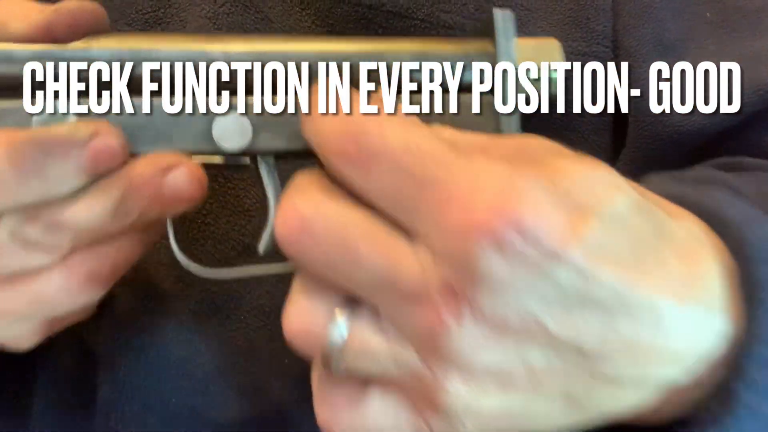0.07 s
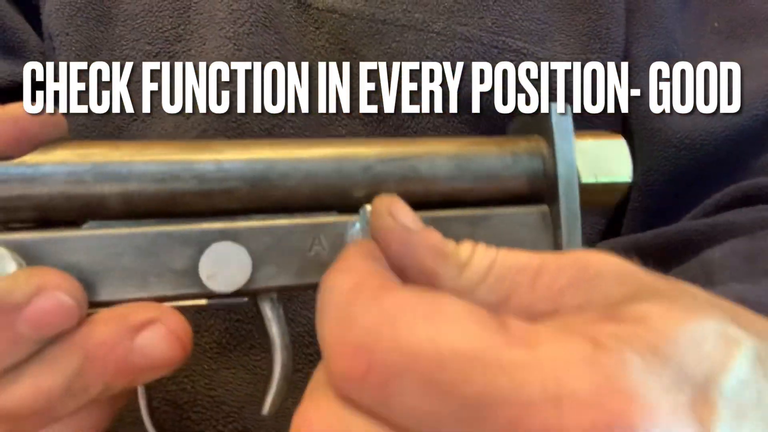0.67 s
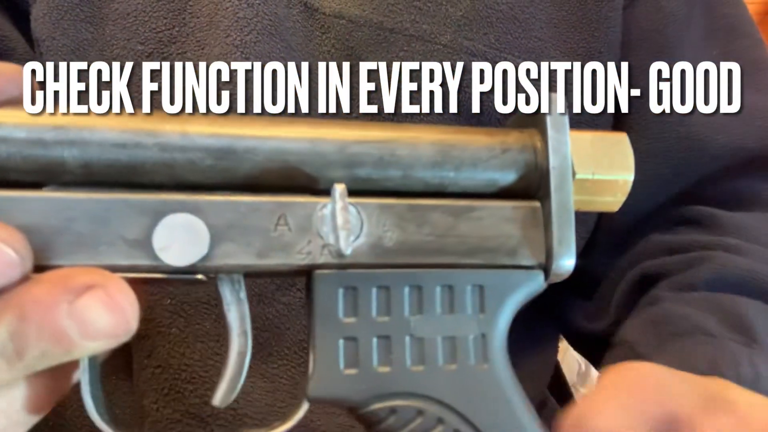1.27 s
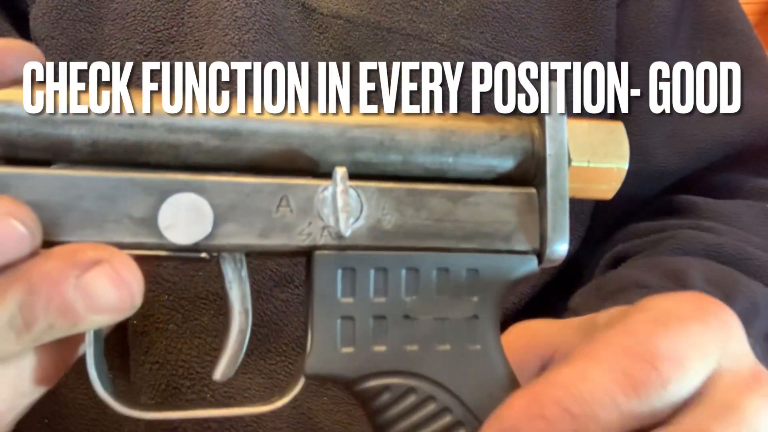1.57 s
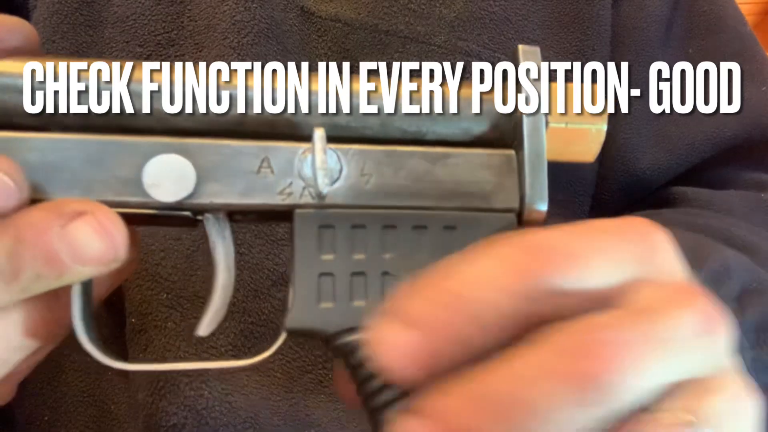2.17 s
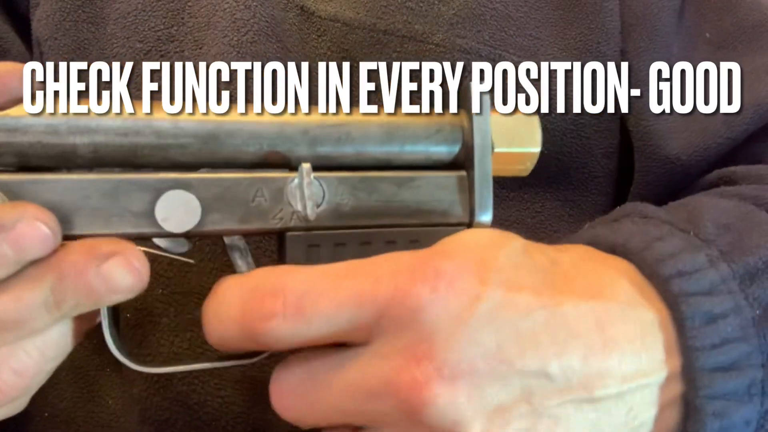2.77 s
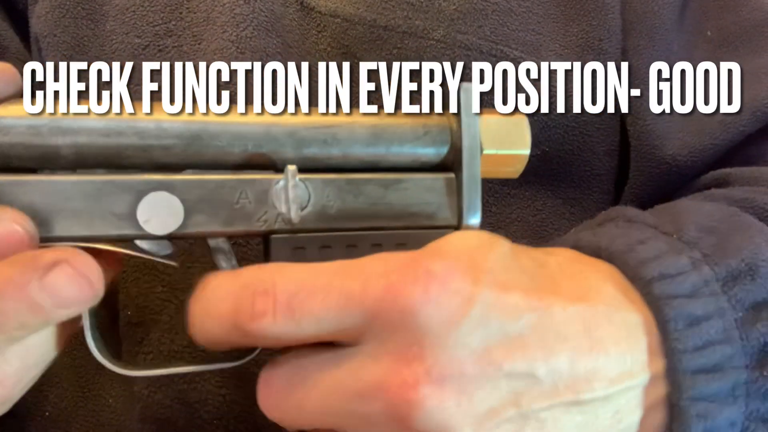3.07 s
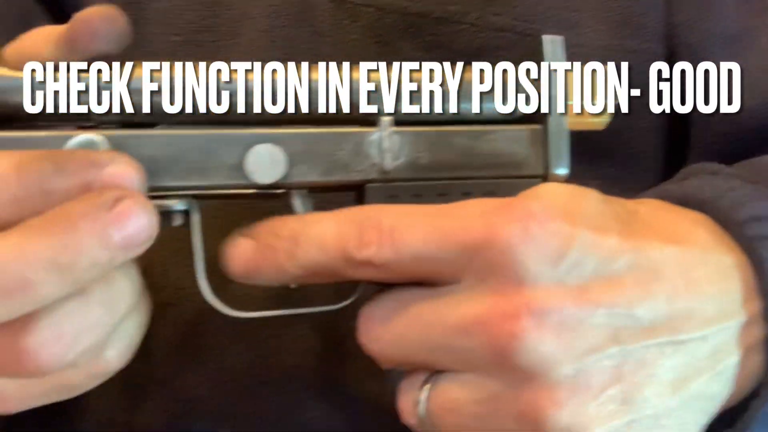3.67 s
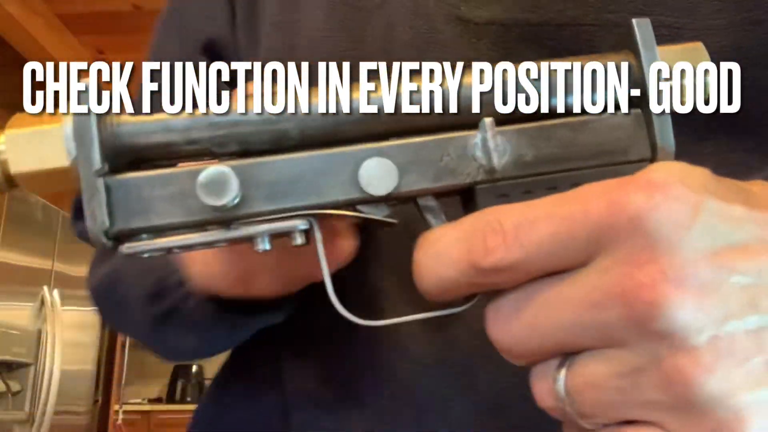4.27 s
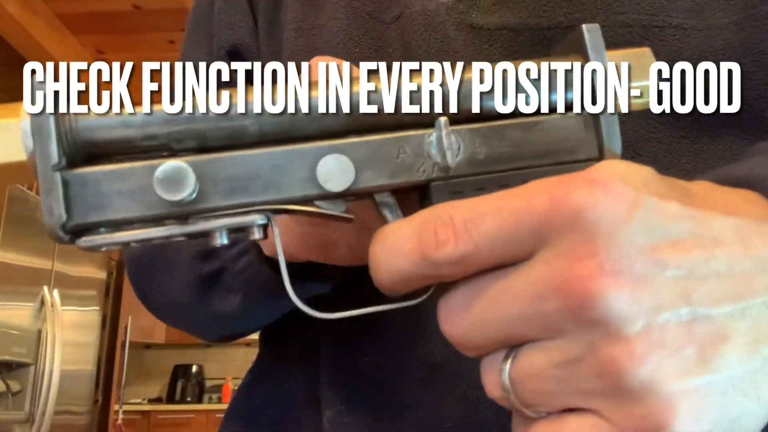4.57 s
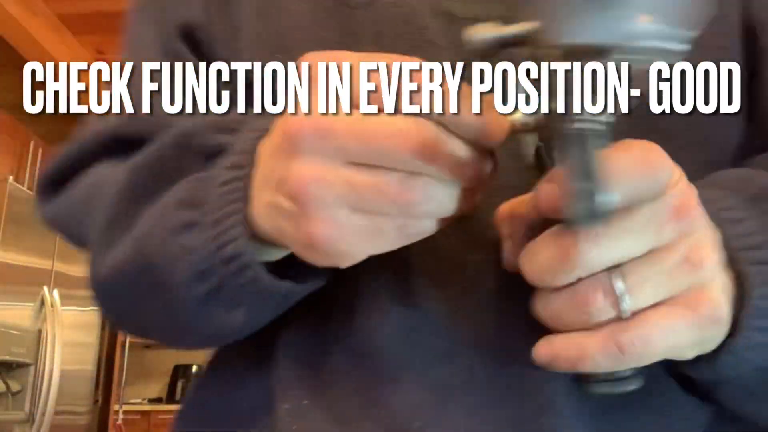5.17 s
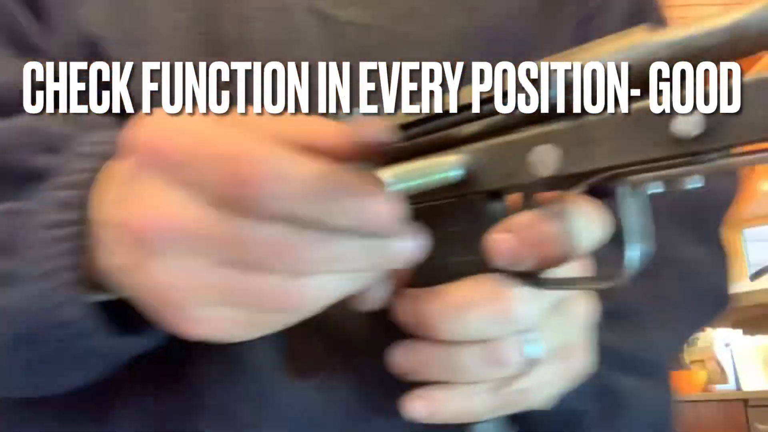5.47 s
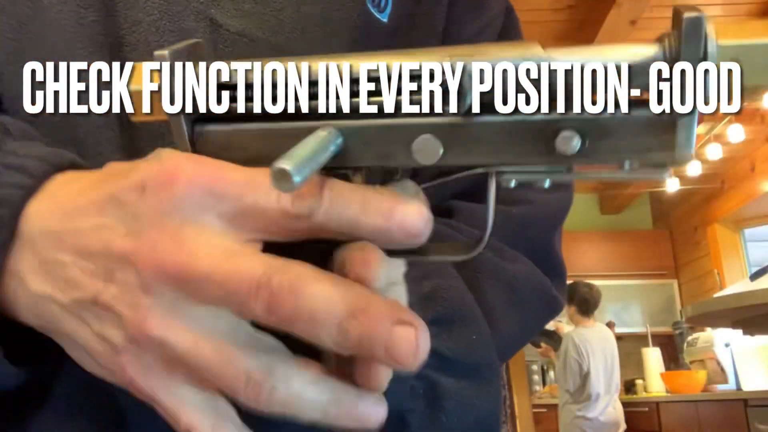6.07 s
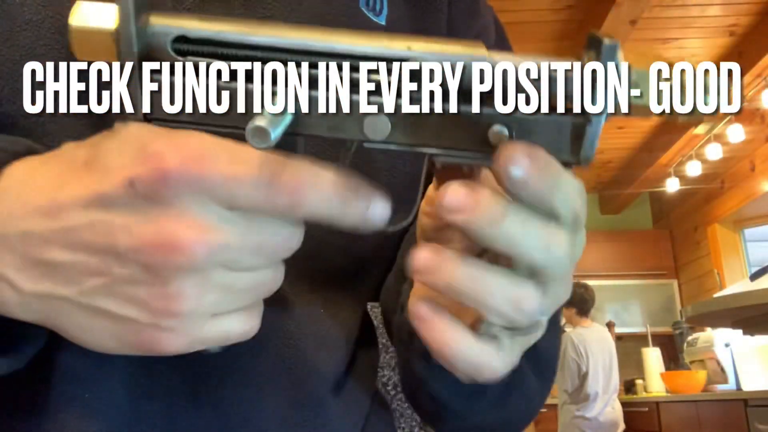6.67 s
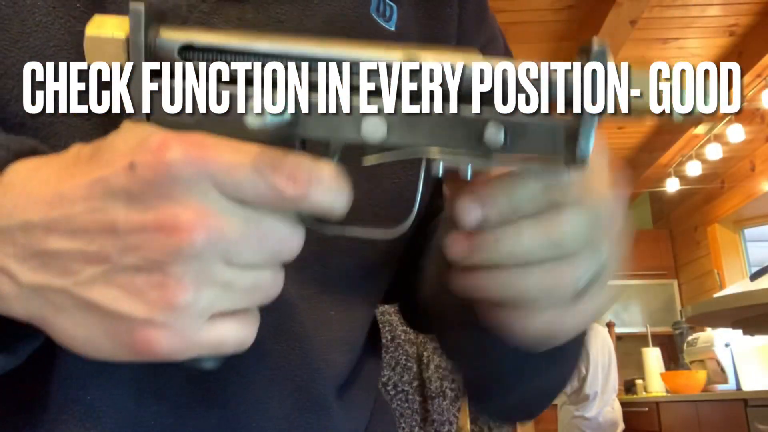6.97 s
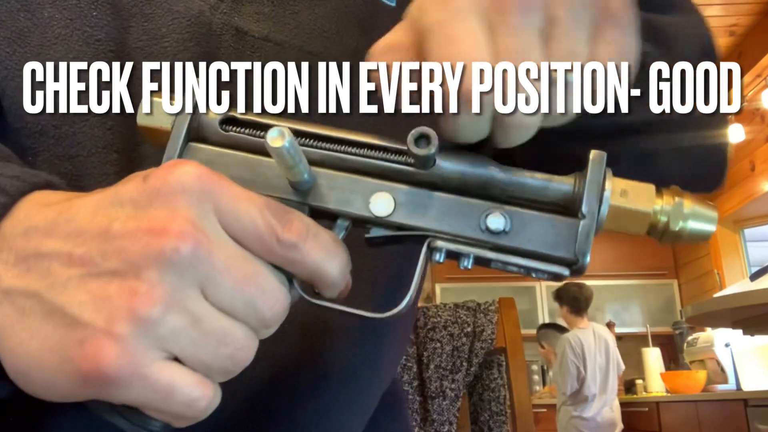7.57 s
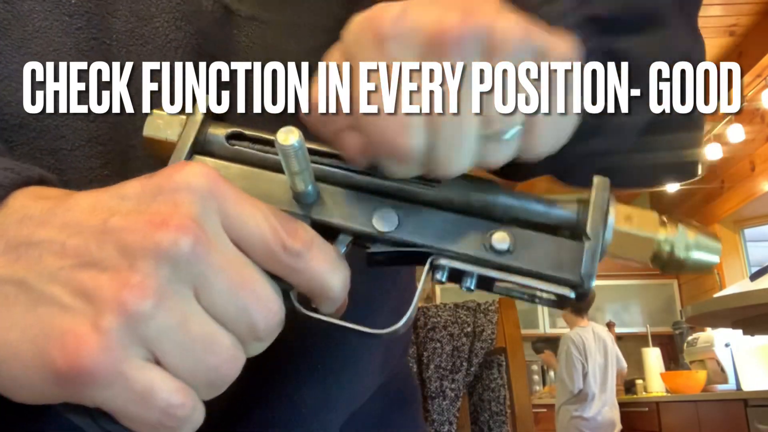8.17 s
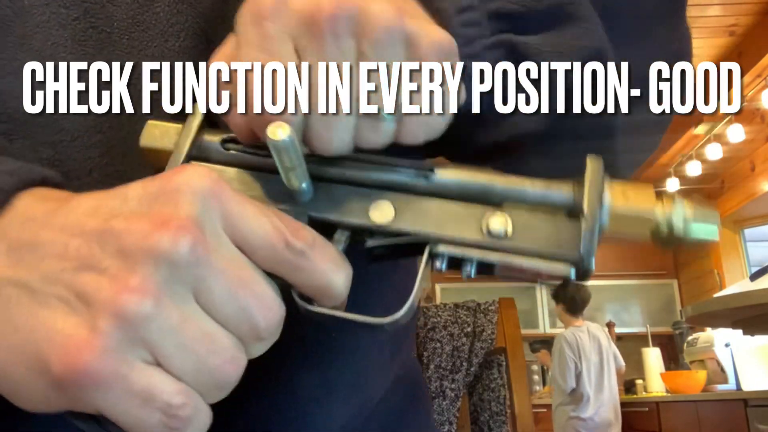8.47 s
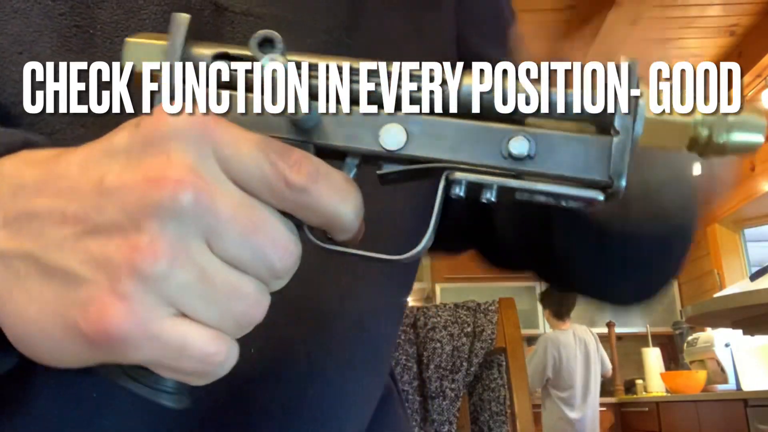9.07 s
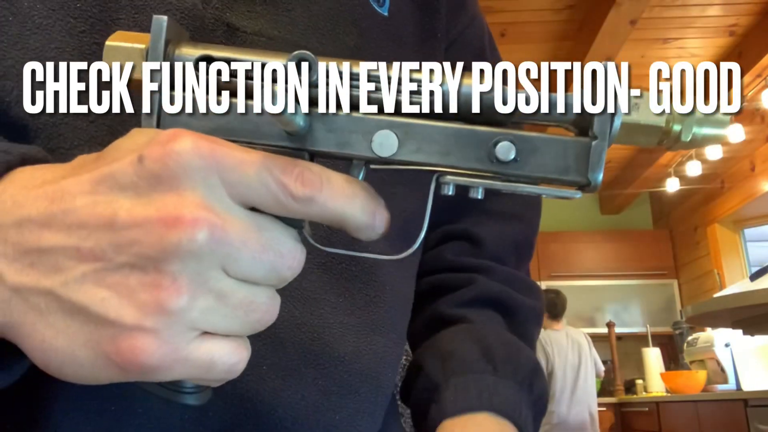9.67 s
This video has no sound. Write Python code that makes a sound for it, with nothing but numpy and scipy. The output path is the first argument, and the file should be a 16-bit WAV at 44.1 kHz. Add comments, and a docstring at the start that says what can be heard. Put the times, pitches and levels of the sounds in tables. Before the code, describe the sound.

A gun's steel mechanism is worked close to the microphone in a quiet kitchen, with a faint low appliance hum and a short echo after each hit. At about 0.6 seconds a selector switch snaps over, hard and sharp. Faint rubbing and tiny squeaks follow, then a light knock at 2.4. The trigger trips with bright, briefly ringing snaps at 2.9, 3.2 and 3.6 seconds, with crisp return clicks around them from 2.7 to 4.1. Soft handling rubs and small ticks fill the next two seconds. A fourth snap comes at 6.3 and a return click at 6.9. Around 8.2 the cocking handle rattles lightly with a soft scrape, followed by a double click at 8.6. The bolt slams home at 9.3 and again at 9.8 seconds, each time a click and then a loud, ringing steel clack.

```python
"""Dummy gun action in a quiet kitchen

Close up, the selector snaps over, the trigger trips the sear four times, and the bolt is drawn back
and slams home twice. Each blow is a brief chatter of steel on steel; the hard ones ring the part.
Rubbing and a faint spring creak come as soft swells of hiss. The room answers each blow
over a low hum, faint squeaks and thin, rough scrapes."""
import sys
import numpy as np
from scipy import signal
from scipy.fft import rfft, irfft, next_fast_len
from scipy.io import wavfile
from scipy.ndimage import uniform_filter1d

SR = 44100
rng = np.random.default_rng(int(sys.argv[2]) if len(sys.argv) > 2 else 0)


def bounce(signal):
    """Save signal as a 16-bit WAV file at the path given by the first command-line argument."""
    frames = np.transpose(np.atleast_2d(signal))
    limited = np.clip(frames, -1, 1)
    pcm = np.round(limited * 32767).astype(np.int16)
    wavfile.write(sys.argv[1], SR, pcm)


N = 437031
TIME = np.arange(N) / SR


def gain_of(db):
    """Decibels to amplitude."""
    return 10 ** (np.asarray(db) / 20)


def unit_rms(x):
    """Scales to rms 1."""
    return x / np.sqrt(np.mean(x ** 2) + 1e-20)


def curve(points, hz):
    """Interpolates (f/Hz, value) rows on a log-frequency axis."""
    f, value = np.transpose(points)
    return np.interp(np.log(hz + 1), np.log(f + 1), value)


def add(mix, start_s, sound):
    """Mixes a sound in at start_s."""
    part = mix[round(start_s * SR):][:len(sound)]
    part += sound[:len(part)]


def noise(colour):
    """Noise of rms 1 with the given spectrum."""
    gain = gain_of(curve(colour, np.fft.rfftfreq(N, 1 / SR)))
    return unit_rms(irfft(rfft(rng.standard_normal(N)) * gain, N))


def flutter(n, width_hz):
    """Complex noise of rms 1, low-passed at width_hz."""
    z = rng.standard_normal(n) + 1j * rng.standard_normal(n)
    z = np.fft.ifft(z / (1 + (np.fft.fftfreq(n, 1 / SR) / width_hz) ** 4))
    return z / np.sqrt(np.mean(abs(z) ** 2))


def coloured(x, db):
    """Minimum-phase filter, one gain per bin of x."""
    log_gain = np.log(gain_of(np.r_[db, db[-2:0:-1]]))
    return irfft(rfft(x) * np.exp(np.conj(signal.hilbert(log_gain)))[:len(db)])


# Room air: f/Hz, relative density/dB
AIR_COLOUR = [(15, -48), (25, -31), (55, -16), (108, -10.5), (175, -12), (200, -9), (229, -12.5),
              (301, -13.5), (575, -19), (714, -23), (2050, -27), (3430, -28), (5000, -30.5), (8360, -32.5),
              (14000, -31.5), (16000, -33.5)]
# Appliance hum: f/Hz, level/dB, waver depth/0-1
HUM_LINES = [(202.8, -66, 0.15), (126.6, -77, 0.8), (168.4, -77.5, 0.5)]


def kitchen(waver_hz=6, air_db=-62.5):
    """Still air and an appliance whose hum holds its pitch and wavers in strength."""
    hum = np.zeros(N)
    for hz, level_db, depth in HUM_LINES:
        line = (1 + depth * flutter(N, waver_hz)) * np.exp(2j * np.pi * hz * TIME)
        hum += gain_of(level_db) * unit_rms(line.real)
    return hum + gain_of(air_db) * noise(AIR_COLOUR)


# Struck steel: f/Hz, relative density/dB
STEEL_COLOUR = [(30, -36.5), (150, -28.5), (300, -17.5), (600, -11), (1100, -11.5), (1700, -3.5),
                (2300, -2), (3200, 2), (4800, 0), (6500, 2.5), (8500, 4), (11500, 0.5), (15500, 3)]


def blow(level_db, contact_ms, body_db, treble_db, pitches_hz=(), pitch_db=10, thud_db=0, evenness=0.16):
    """Steel chatters on steel for a few milliseconds; the gripping hand damps it at once."""
    n, rise_ms, decay_ms = 4096, 0.71, 1.0
    thud_hz, body_hz, treble_hz = 130, 1500, 6500
    ms, hz = np.arange(n) * 1000 / SR, np.fft.rfftfreq(n, 1 / SR)
    rise = 1 - np.exp(-ms / rise_ms)
    decay = np.exp(-np.maximum(ms - 0.88 * contact_ms, 0) / decay_ms)
    chatter = rng.standard_normal(n) * rise * decay
    db = curve(STEEL_COLOUR, hz) + body_db / (1 + (hz / body_hz) ** 4)
    db += 2 * treble_db * hz ** 2 / (hz ** 2 + treble_hz ** 2)  # treble_db at treble_hz, more above
    db += thud_db / (1 + (hz / thud_hz) ** 4)  # a hard blow shoves the whole frame
    ripple_db = 10 * np.log10(uniform_filter1d(abs(rfft(chatter)) ** 2, size=19) + 1e-9)
    db -= evenness * ripple_db  # many contact points even out peaks and dips
    for pitch_hz in pitches_hz:
        width_hz = 170 + 0.02 * pitch_hz
        db += pitch_db / (1 + ((hz - pitch_hz) / width_hz) ** 2)
    return gain_of(level_db) * unit_rms(coloured(chatter, db)) * np.sqrt(contact_ms / ms[-1])


def ring(modes):
    """Each resonance is a tight cluster of modes that beat as they die."""
    t = np.arange(SR // 2) / SR
    out = np.zeros(len(t))
    for hz, energy_db, t60_s in modes:
        cluster = (flutter(len(t), width_hz=45 + 0.0078 * hz) * np.exp(2j * np.pi * hz * t)).real
        out += gain_of(energy_db) * unit_rms(cluster * np.exp(-np.log(1000) * t / t60_s))
    return out / np.sqrt(len(t))


# Room decay: f/Hz, T60/s
ROOM_DECAY = [(200, 0.34), (1000, 0.41), (3000, 0.53), (7000, 0.47), (11000, 0.36), (16000, 0.25)]
# Echo spectrum: f/Hz, relative gain/dB
ECHO_COLOUR = [(80, -7), (450, 1.5), (1000, -1), (2000, -2.5), (4000, -0.5), (8000, 1), (16000, 2.5)]


def room(x, gap_s, early_db, early_s, floor_db=-14):
    """After a gap the walls return a knot of early echoes, then a tail whose top treble dies first."""
    t = np.arange(SR * 3 // 4) / SR
    onset = gain_of(floor_db) + 1 / (1 + np.exp(np.clip((gap_s - t) / 0.0012, -50, 50)))
    early = 1 + gain_of(early_db) * np.exp(-np.maximum(t - gap_s, 0) / early_s)
    hz, frame_s, echoes = signal.stft(rng.standard_normal(len(t)) * onset * early, SR, nperseg=256)
    colour = gain_of(curve(ECHO_COLOUR, hz))[:, None]
    decay = np.exp(-np.log(1000) * frame_s / curve(ROOM_DECAY, hz)[:, None])
    response = signal.istft(echoes * colour * decay, SR, nperseg=256)[1]
    return signal.fftconvolve(x, response / np.linalg.norm(response))


def snaps(blows, modes, ring_db, thud_db, **echo):
    """A sprung part hits its stop and rings; much of the sound goes sideways into the room."""
    out = np.zeros(N)
    for start_s, level_db, contact_ms, body_db, treble_db, room_db, *_ in blows:
        crack = blow(level_db, contact_ms, body_db, treble_db, thud_db=thud_db)
        metal = np.linalg.norm(crack) * ring(modes)
        add(out, start_s, crack)
        add(out, start_s, gain_of(ring_db) * metal)
        # the room gets all directions at once: a smoother spectrum
        add(metal, 0, blow(level_db, contact_ms, body_db, treble_db, evenness=0.58))
        add(out, start_s, gain_of(room_db) * room(metal, **echo))
    return out


# Selector blows: t/s, level/dB, contact/ms, body/dB, treble/dB, room/dB
SELECTOR_BLOWS = [(.606, -44.5, 7, -11.5, -17, -15.5), (.6125, -17, 3.2, -1.5, -5.5, -7),
                  (.6160, -9.5, 3.5, -0.5, 1.5, -9), (.6195, -12.5, 3.5, -1.5, 1, -7.5)]
# Selector modes: f/Hz, relative energy/dB, T60/s
SELECTOR_RING = [(1794, -30.5, 0.043), (2910, -30, 0.17), (5080, -13, .012), (5360, -27.5, 0.08),
                 (7500, -23, 0.11)]


def selector():
    """The selector snaps over in a quick run of blows."""
    return snaps(SELECTOR_BLOWS, SELECTOR_RING, ring_db=1, thud_db=24.5,
                 gap_s=0.0058, early_db=6.5, early_s=0.018)


# Squeaks and scrapes: t/s, length/s, level/dB, start f/Hz, end f/Hz, roughness/Hz
SQUEAKS_AND_SCRAPES = [(0.757, 0.053, -59, 1320, 1470, 150), (1.56, 0.094, -59.5, 1424, 1550, 190),
                       (3.877, 0.059, -64, 1943, 1900, 180), (4.13, 0.057, -66, 1783, 1750, 180),
                       (2.24, 0.21, -65.5, 3600, 3910, 704), (4.79, 0.16, -67.5, 3460, 3410, 500),
                       (8.037, 0.04, -63, 1745, 1710, 220), (8.756, 0.039, -56, 2430, 2160, 300),
                       (8.874, 0.09, -58, 1035, 977, 90), (9.076, 0.018, -55, 2920, 3200, 302)]


def squeaks_and_scrapes():
    """Faint squeaks and thin, rough scrapes: short glides heard only through the room's echoes."""
    out = np.zeros(N)
    for start_s, length_s, level_db, start_hz, end_hz, rough_hz in SQUEAKS_AND_SCRAPES:
        n = round(length_s * SR)
        glide = np.exp(2j * np.pi * np.cumsum(np.linspace(start_hz, end_hz, n)) / SR)
        tone = unit_rms((glide * flutter(n, rough_hz)).real * signal.windows.tukey(n, 0.3))
        add(out, start_s, gain_of(level_db) * room(tone, gap_s=0.0022, early_db=10.5, early_s=0.0076))
    return out


# Swells of hiss: peak t/s, swell/s, level/dB, treble/dB
HISS_SWELLS = [(1.45, 0.25, -60, -4), (2.195, 0.041, -66, 16), (3.55, 0.084, -51, -4),
               (4.83, .04, -63.5, -6), (5.05, .06, -58, -14), (5.27, 0.071, -62.5, 0.5),
               (5.669, 0.071, -46.5, -9.5), (5.99, 0.035, -55.5, -3), (7.25, 0.22, -62, -2.5),
               (7.78, 0.12, -57, -4), (8.13, 0.036, -53, -6), (8.25, 0.019, -44.5, -16),
               (8.921, 0.043, -62.5, -5)]
# Friction hiss: f/Hz, relative density/dB
HISS_COLOUR = [(290, -36.5), (500, -12), (1060, -8), (1380, -5), (1900, -4.5), (3810, -3), (4530, -6.5),
               (6230, -2), (16000, -5.5)]


def rubs_and_creak(grain_db=1.0, treble_hz=5000, fade_ratio=1.46):
    """Rubbing and a faint spring creak: soft, grainy hiss that swells, then fades more slowly."""
    hiss = noise(HISS_COLOUR)
    grain = unit_rms(uniform_filter1d(rng.standard_normal(N), size=90))
    hiss = unit_rms(hiss * gain_of(grain_db * grain))
    dull = signal.sosfilt(signal.butter(1, treble_hz, fs=SR, output="sos"), hiss)
    out = np.zeros(N)
    for peak_s, swell_s, level_db, treble_db in HISS_SWELLS:
        sigmas = (TIME - peak_s) / np.where(TIME < peak_s, swell_s, fade_ratio * swell_s)
        envelope = np.exp(-0.5 * np.minimum(sigmas ** 2, 100))
        out += gain_of(level_db) * envelope * (dull + gain_of(treble_db) * (hiss - dull))
    return out


def tick(level_db, contact_ms, pitches_hz, body_db, treble_db, room_db):
    """Small parts touch: a short tick with broad pitches, and its echo."""
    sideways = blow(level_db, contact_ms, body_db, treble_db, pitches_hz, pitch_db=3, evenness=0.48)
    out = gain_of(room_db) * room(sideways, gap_s=0.0089, early_db=11, early_s=0.01)
    add(out, 0, blow(level_db, contact_ms, body_db, treble_db, pitches_hz))
    return out


# Loose parts: t/s, level/dB, body/dB, treble/dB, f/Hz
GRIP_KNOCKS = [(2.383, -31, 6, -10, 4630), (2.983, -36.5, 1, -8.5, 3650), (4.7925, -49, 5, -13, 3460),
               (5.815, -53.5, 8, -14, 1900), (6.1832, -37.5, 0, -12, 4290), (6.1914, -36.5, -2, -6, 4270),
               (6.5916, -38.5, 4.5, -10.5, 3570), (6.6997, -48, 1.5, -26, 3620),
               (6.8553, -38, -5, -13, 3600), (6.8667, -29, 3, -8, 2270), (7.227, -50.5, 8, -16, 1880),
               (8.1594, -34.5, 4, -12.5, 5060), (8.2564, -30.5, 12.5, 0.5, 2660),
               (8.3545, -47.5, 3, -14, 2340), (8.472, -53.5, 13, -12.5, 1680), (9.7381, -41, 0, -15, 2500),
               (9.774, -35, 8, -14, 3530)]


def knocks(contact_ms=2.56):
    """Loose parts take up their play as the grip shifts."""
    out = np.zeros(N)
    for start_s, level_db, body_db, treble_db, hz in GRIP_KNOCKS:
        add(out, start_s, tick(level_db, contact_ms, [hz], body_db, treble_db, room_db=-8.5))
    return out


# Trigger returns: t/s, level/dB, contact/ms, low f/Hz, high f/Hz
TRIGGER_RESETS = [(2.7018, -13.5, 1.02, 3370, 8740), (3.0667, -12.5, 1.94, 3370, 9100),
                  (3.4251, -17.5, 3.6, 3310, 13600), (4.1073, -20.5, 1.8, 3270, 13300),
                  (6.9181, -22, 4.5, 1600, 6050)]


def trigger():
    """The trigger is let go and springs back."""
    out = np.zeros(N)
    for start_s, level_db, contact_ms, *pitches_hz in TRIGGER_RESETS:
        click = tick(level_db, contact_ms, pitches_hz, body_db=5.1, treble_db=0.83, room_db=-11)
        add(out, start_s, click)
    return out


# Sear trips: t/s, level/dB, contact/ms, body/dB, treble/dB, room/dB, settle delay/s, settle level/dB
SEAR_TRIPS = [(2.8865, -12, 3.75, -8, 0.012, -6.5, .1225, -22),
              (3.2394, -12.5, 3.66, -6.5, 0, -4.5, 0.12, -26.5), (3.6050, -11, 5.2, -4.5, 1, -6, .159, -31),
              (6.303, -14, 5.4, -7.5, 0, -9, .119, -32)]
# Sear modes: f/Hz, relative energy/dB, T60/s
SEAR_RING = [(1640, -27, 0.046), (2620, -22, 0.054), (2910, -24.5, 0.36), (3240, -22, 0.24),
             (4120, -25.5, .08), (5300, -23, 0.25), (7040, -26, .15), (8730, -25, .1), (8300, -18.5, 0.22),
             (10160, -12.5, 0.17), (10290, -16.5, .2), (12830, -27, .1), (13580, -27, .2)]


def sear(creep_lead_s=0.009):
    """The sear drags, slips with a ringing snap, and its lever settles."""
    out = snaps(SEAR_TRIPS, SEAR_RING, ring_db=2.5, thud_db=7.5,
                gap_s=0.013, early_db=4.5, early_s=0.013)
    for start_s, level_db, *_, settle_s, settle_db in SEAR_TRIPS:
        creep = tick(level_db - 25, contact_ms=11, pitches_hz=(2700, 7300),
                     body_db=-5, treble_db=-13, room_db=-12)
        settle = tick(settle_db, contact_ms=4.05, pitches_hz=(4400, 3000),
                      body_db=-4, treble_db=-2.5, room_db=-11)
        add(out, start_s - creep_lead_s, creep)
        add(out, start_s + settle_s, settle)
    return out


# Handle rattles: t/s, length/s, level/dB
HANDLE_RATTLES = [(8.166, .008, -42.5), (8.262, .04, -40.5)]
# Bolt on its catch: t/s, level/dB, contact/ms, low f/Hz, high f/Hz
CATCH_CLICKS = [(8.641, -18, 4.1, 2680, 6980), (8.657, -17.5, 3.7, 5000, 8000),
                (9.286, -17.5, 3.6, 3800, 14900), (9.761, -16.5, 5.3, 4100, 13000)]


def cocking(tap_gap_s=0.0105, jitter_s=0.0012, scatter_db=2):
    """The handle rattles unevenly in its slot; the drawn bolt strikes or slips off its catch."""
    out = np.zeros(N)
    for start_s, length_s, level_db in HANDLE_RATTLES:
        for tap_s in np.arange(start_s, start_s + length_s, tap_gap_s):
            late, hard = rng.standard_normal(2)
            tap = tick(level_db + scatter_db * hard, contact_ms=3.8, pitches_hz=(1420, 7400),
                       body_db=10.8, treble_db=-8, room_db=-4)
            add(out, tap_s + jitter_s * late, tap)
    for start_s, level_db, contact_ms, *pitches_hz in CATCH_CLICKS:
        add(out, start_s, tick(level_db, contact_ms, pitches_hz, body_db=10, treble_db=1, room_db=-9.5))
    return out


# Bolt blows: t/s, level/dB, contact/ms, body/dB, treble/dB, room/dB
FIRST_SLAM = [(9.3175, -27.5, 3.9, 7, 3, -6.5), (9.3235, -30, 2.96, 2, -6, -7),
              (9.3280, -23.5, 6.3, 10, -6.5, -16), (9.3330, -9, 3.53, 0, 5, 2.5)]
SECOND_SLAM = [(9.7895, -24, 4.6, -6, -1.3, 2), (9.7923, -12.5, 2.8, 0, 1, 4.2)]
# Bolt modes: f/Hz, relative energy/dB, T60/s
FIRST_SLAM_RING = [(400.4, -31.5, 0.041), (510, -32, 0.089), (2800, -29, 0.17), (3140, -22.5, 0.28),
                   (3290, -23, 0.18), (7060, -27, 0.094), (8260, -16, 0.036), (8600, -44, .08),
                   (15150, -16, .04)]
SECOND_SLAM_RING = [(1653, -20, 0.053), (2930, -35.5, .2), (4250, -17.5, .03), (4870, -17.5, 0.11),
                    (6720, -12.5, .12), (6950, -13.5, 0.089), (8240, -10, 0.14), (8560, -16, 0.11),
                    (10640, -16, .08), (13450, -6.5, 0.2), (14700, -13.5, .05)]


def bolt():
    """The bolt slams home twice, each time with its own ring."""
    first = snaps(FIRST_SLAM, FIRST_SLAM_RING, ring_db=3, thud_db=18,
                  gap_s=0.0176, early_db=-6, early_s=0.0072)
    second = snaps(SECOND_SLAM, SECOND_SLAM_RING, ring_db=-3, thud_db=20.5,
                   gap_s=0.014, early_db=3, early_s=0.021)
    return first + second


def scene():
    """The action over the quiet room, in mono."""
    mix = kitchen() + selector() + squeaks_and_scrapes() + rubs_and_creak()
    mix += knocks() + trigger() + sear() + cocking() + bolt()
    return mix[None]


def record(dry, low_cut_hz=38, lag_cycles=1.2, band_limit_hz=15850):
    """The microphone's low cut delays the bass by about a cycle; a band limit follows."""
    n = next_fast_len(N + SR)
    hz = np.fft.rfftfreq(n, 1 / SR)
    low_cut = 1 / np.sqrt(1 + (low_cut_hz / (hz + 1)) ** 6)
    lag = np.exp(-2j * np.pi * lag_cycles * np.log(hz + 10))
    mic = irfft(rfft(dry, n) * low_cut * lag, n)[:, :N]
    low_pass = signal.firwin(401, band_limit_hz, window=("kaiser", 7), fs=SR)
    return signal.oaconvolve(mic, low_pass[None], "same")


dry = scene()
out = record(dry)
bounce(out)
```